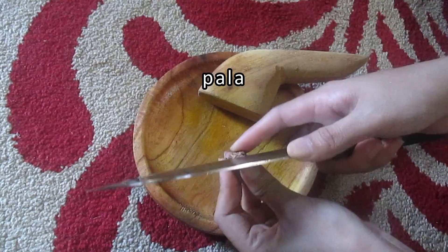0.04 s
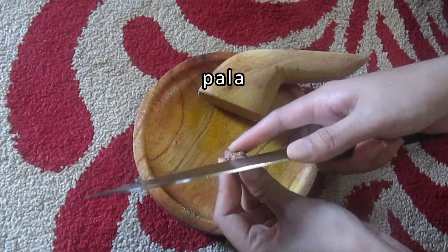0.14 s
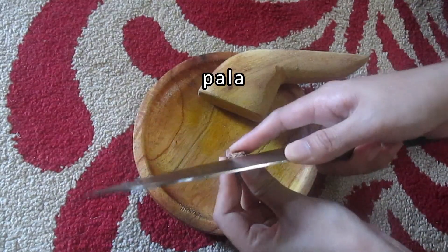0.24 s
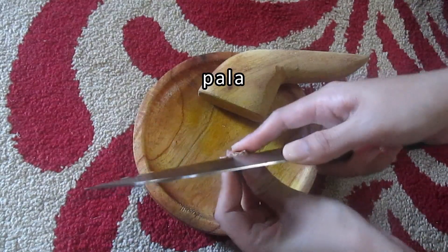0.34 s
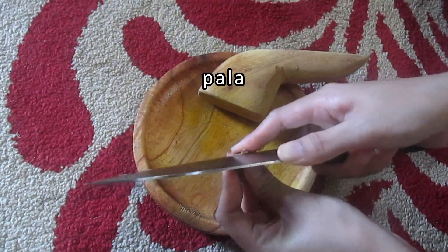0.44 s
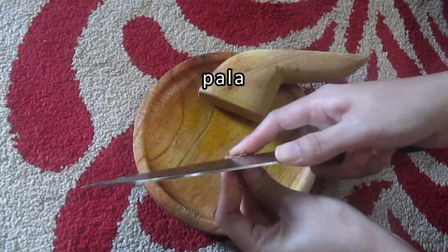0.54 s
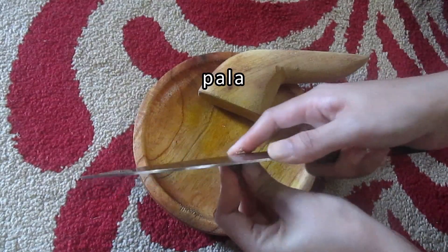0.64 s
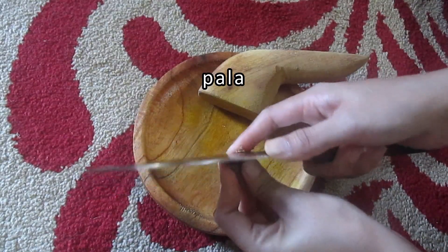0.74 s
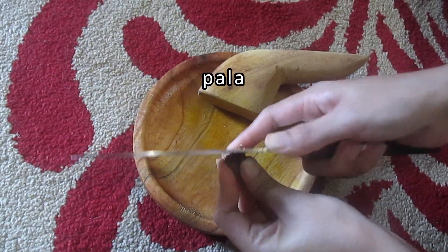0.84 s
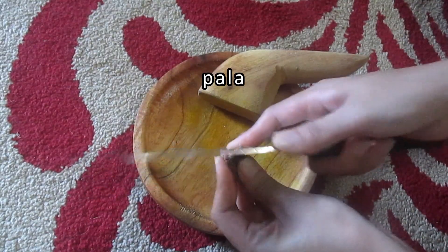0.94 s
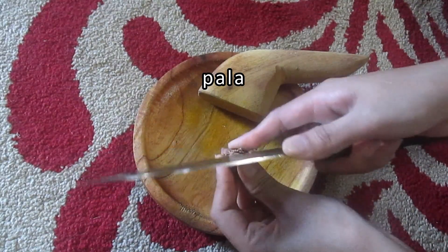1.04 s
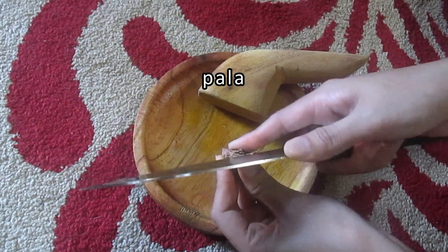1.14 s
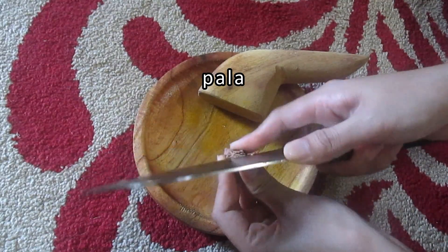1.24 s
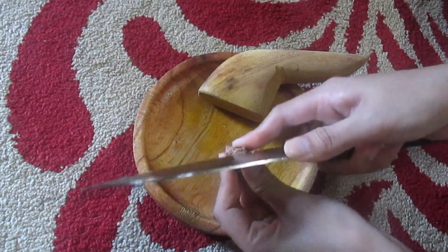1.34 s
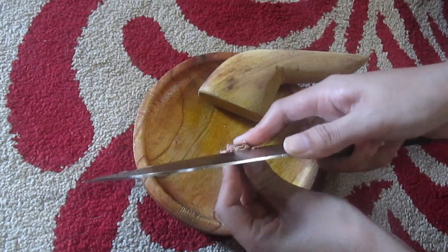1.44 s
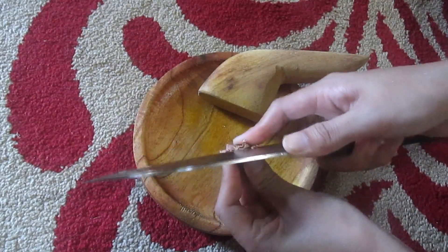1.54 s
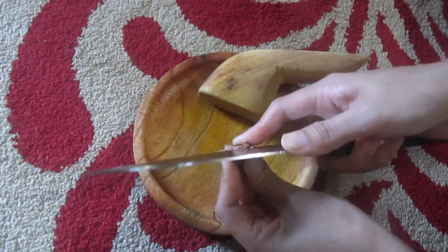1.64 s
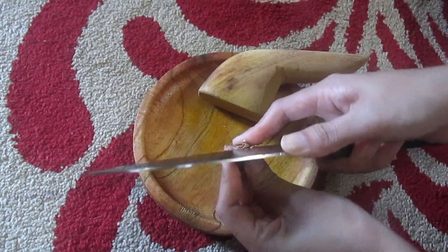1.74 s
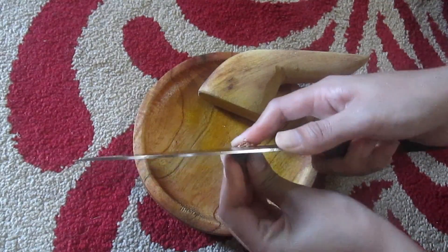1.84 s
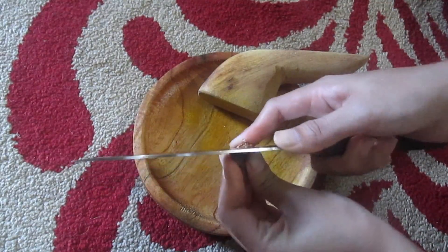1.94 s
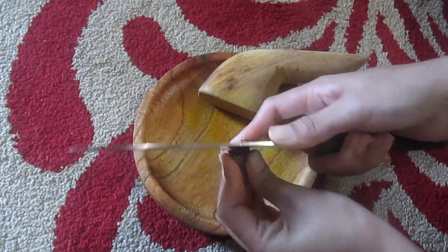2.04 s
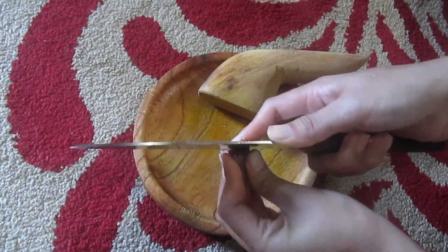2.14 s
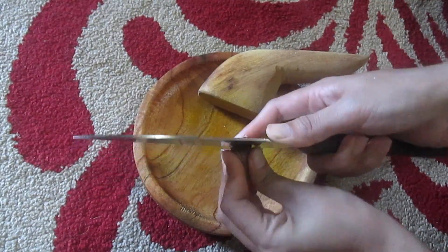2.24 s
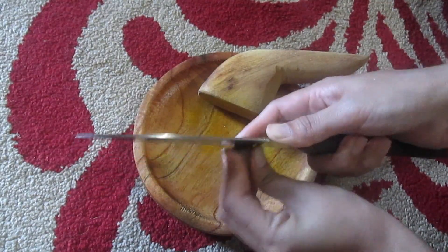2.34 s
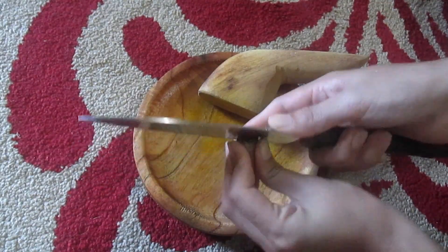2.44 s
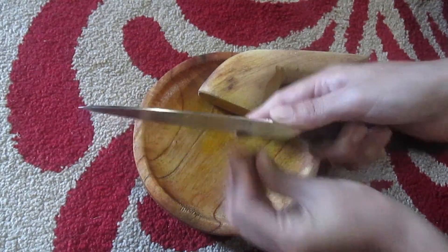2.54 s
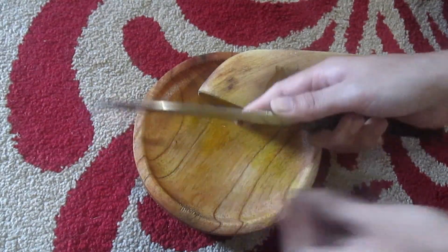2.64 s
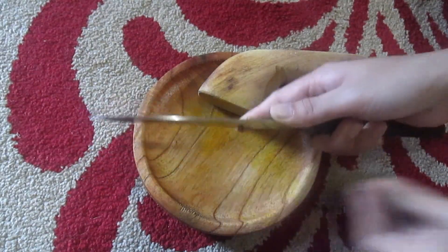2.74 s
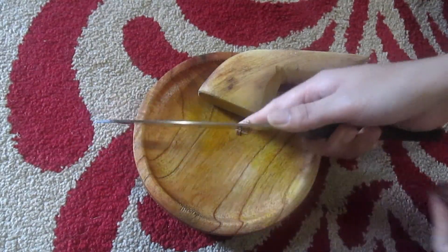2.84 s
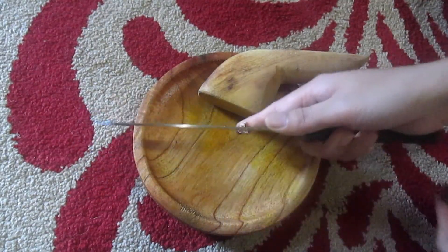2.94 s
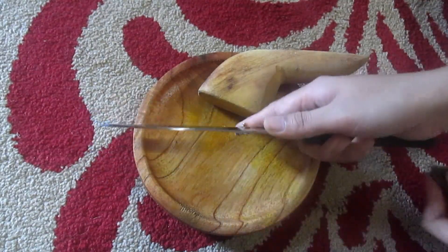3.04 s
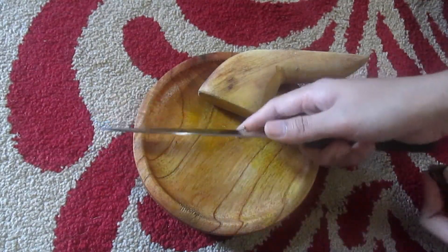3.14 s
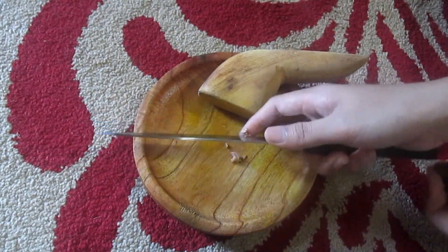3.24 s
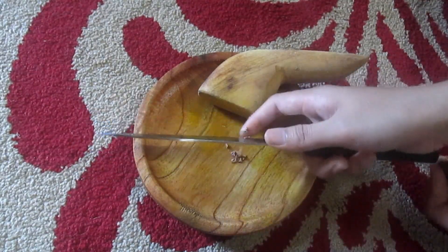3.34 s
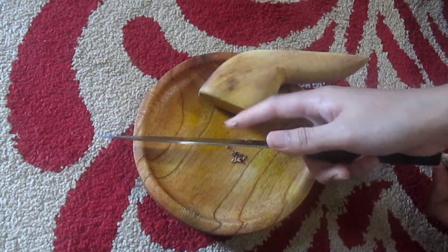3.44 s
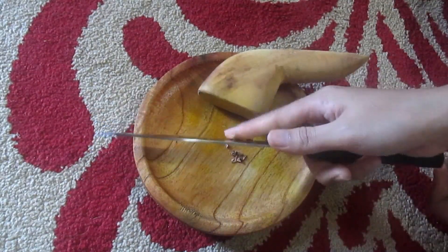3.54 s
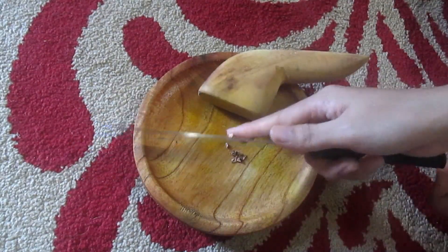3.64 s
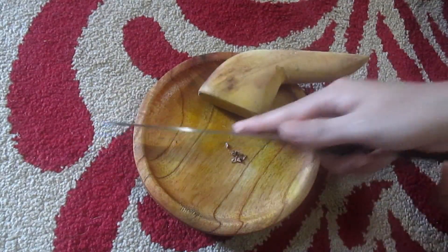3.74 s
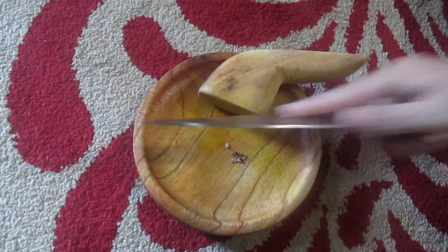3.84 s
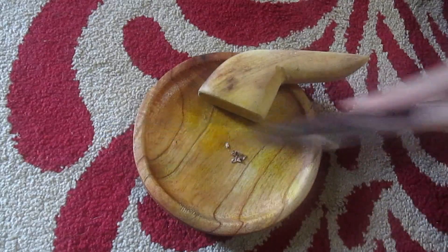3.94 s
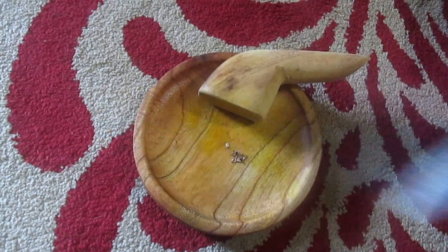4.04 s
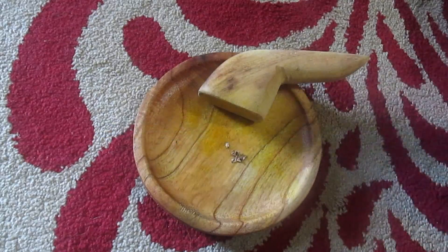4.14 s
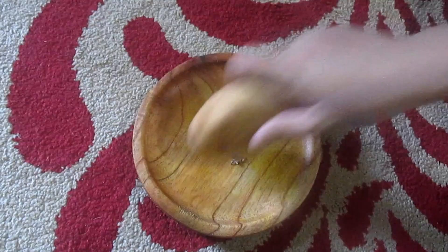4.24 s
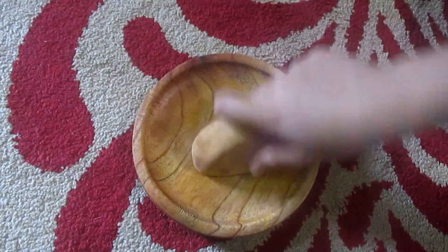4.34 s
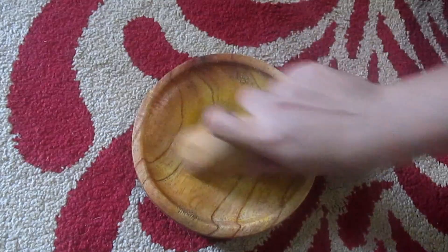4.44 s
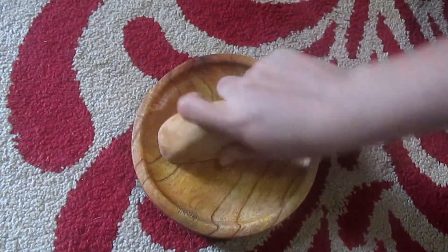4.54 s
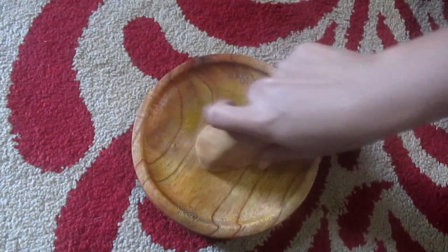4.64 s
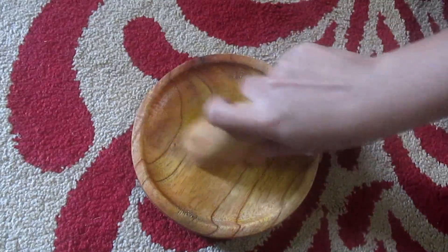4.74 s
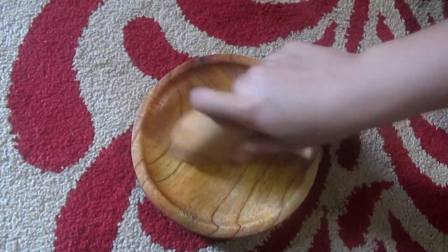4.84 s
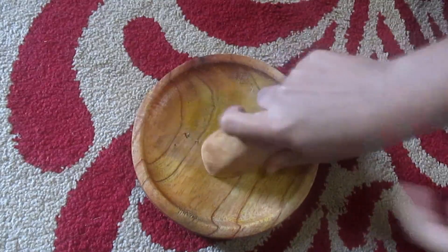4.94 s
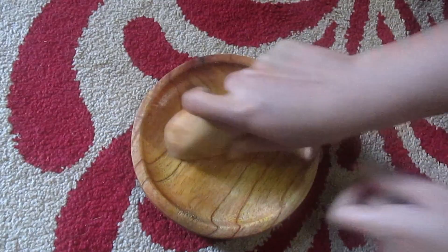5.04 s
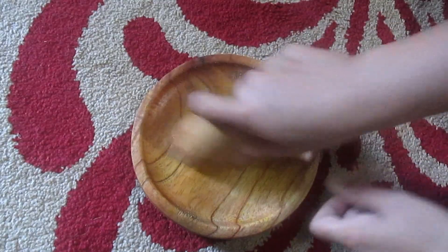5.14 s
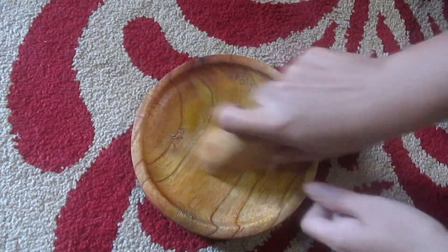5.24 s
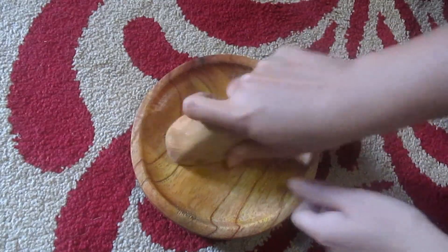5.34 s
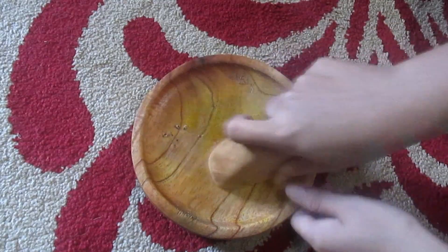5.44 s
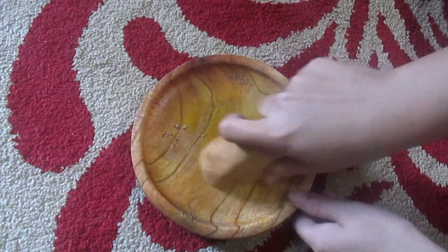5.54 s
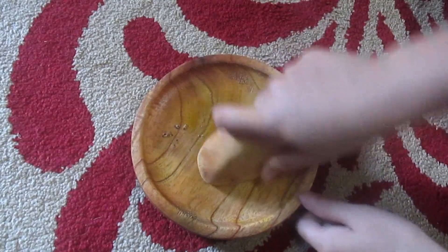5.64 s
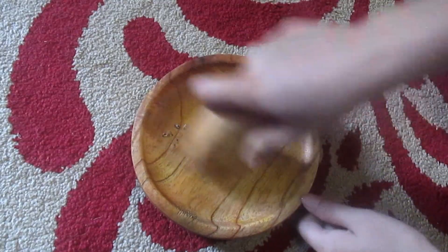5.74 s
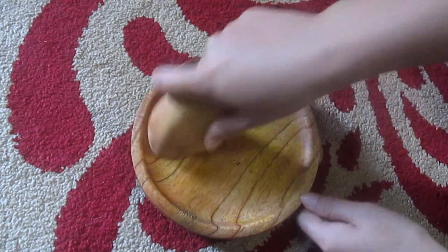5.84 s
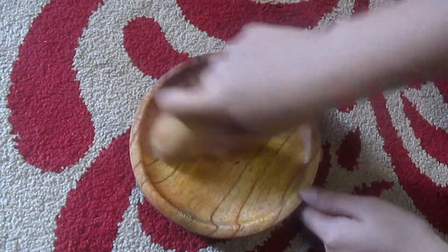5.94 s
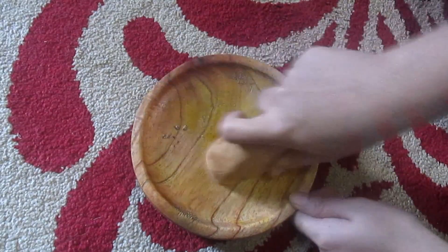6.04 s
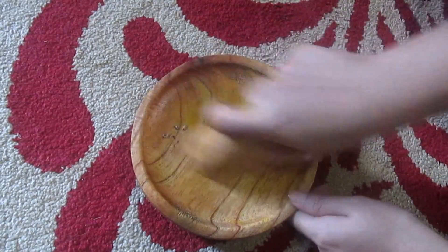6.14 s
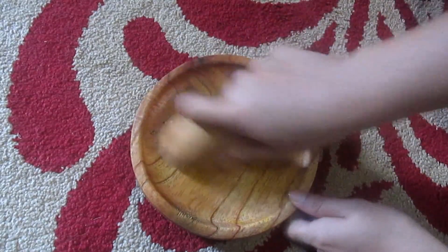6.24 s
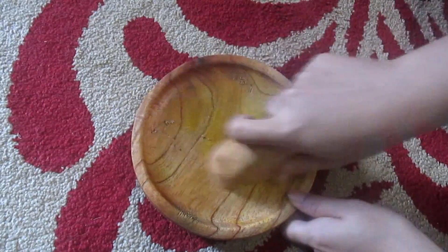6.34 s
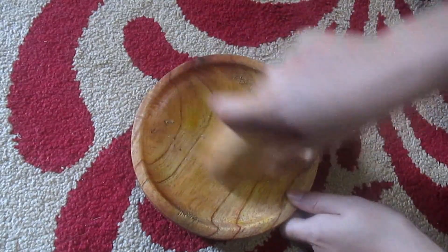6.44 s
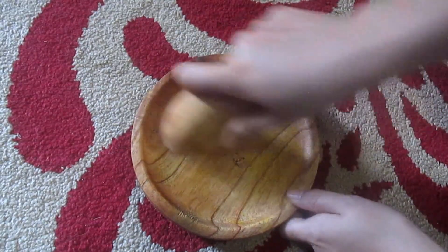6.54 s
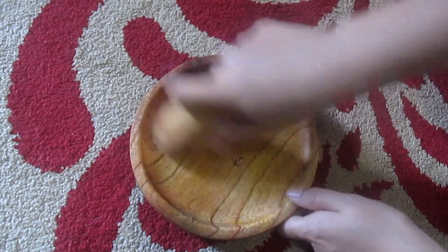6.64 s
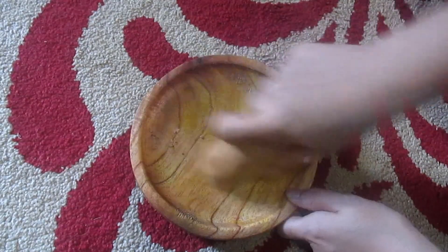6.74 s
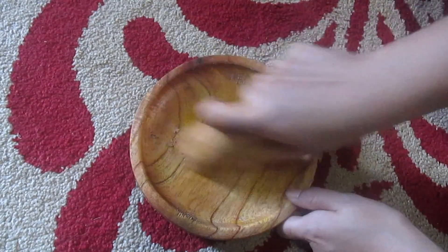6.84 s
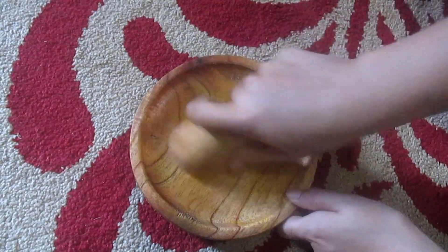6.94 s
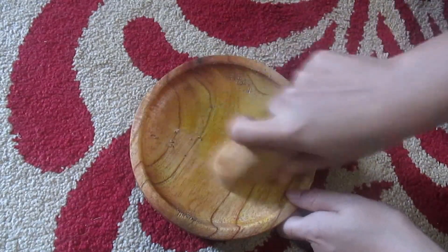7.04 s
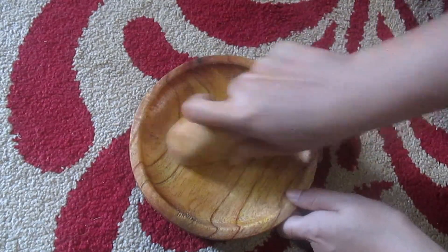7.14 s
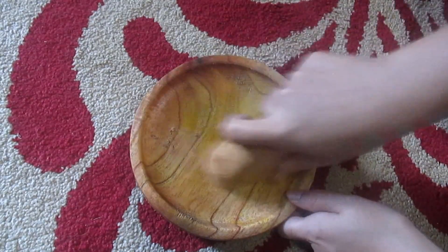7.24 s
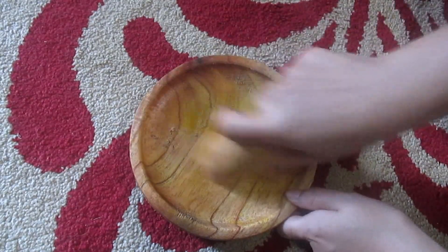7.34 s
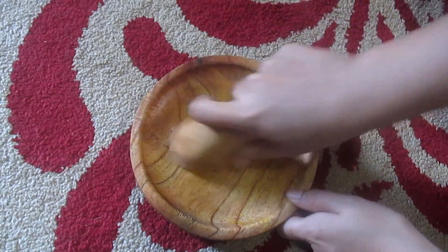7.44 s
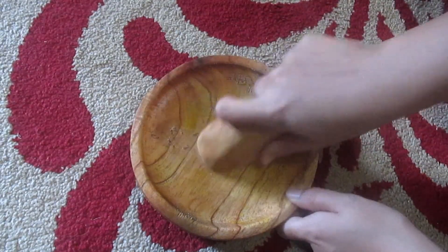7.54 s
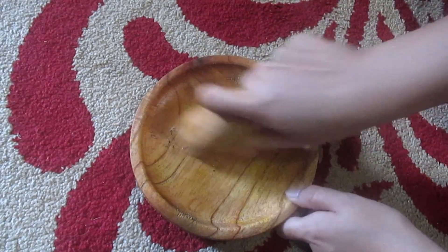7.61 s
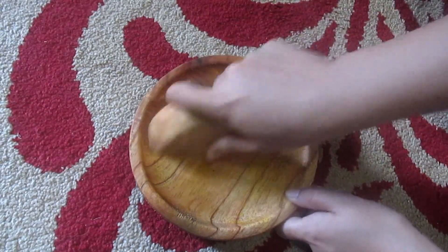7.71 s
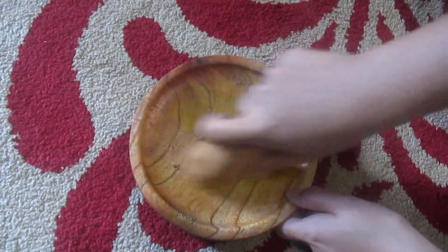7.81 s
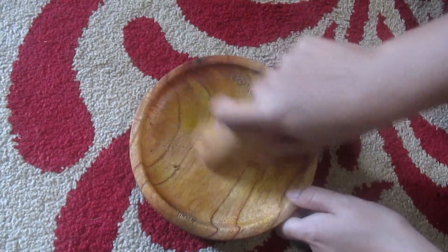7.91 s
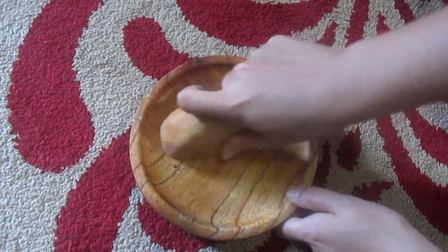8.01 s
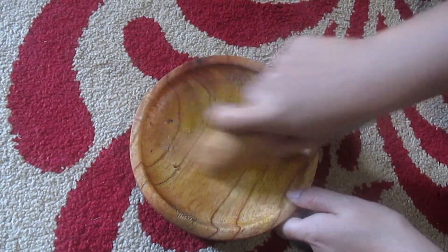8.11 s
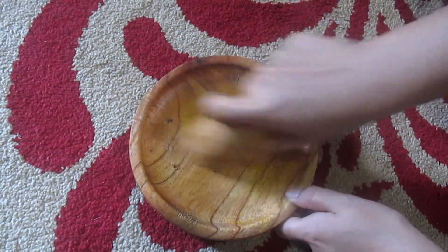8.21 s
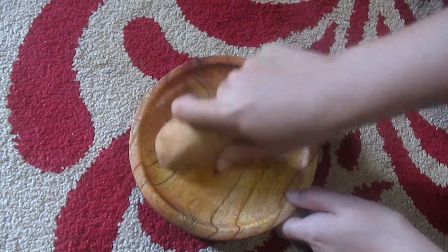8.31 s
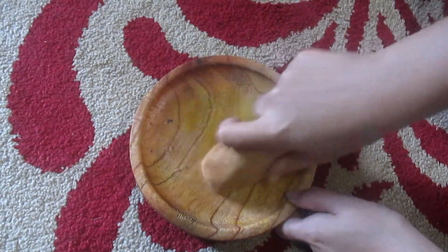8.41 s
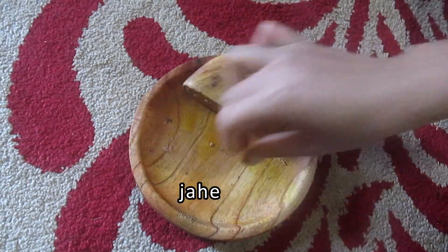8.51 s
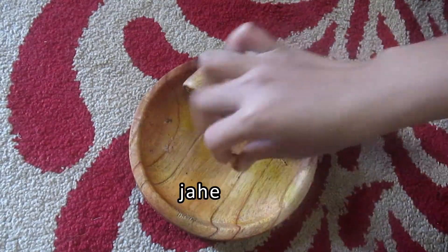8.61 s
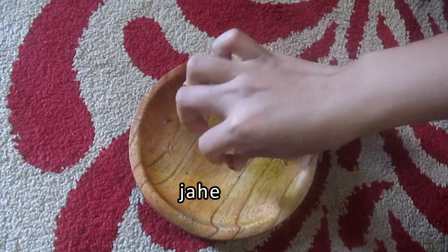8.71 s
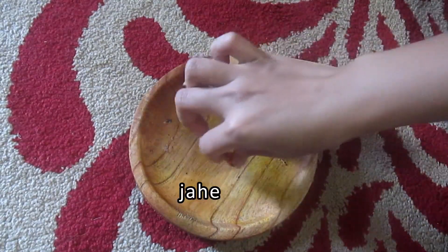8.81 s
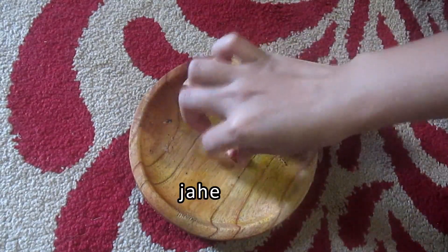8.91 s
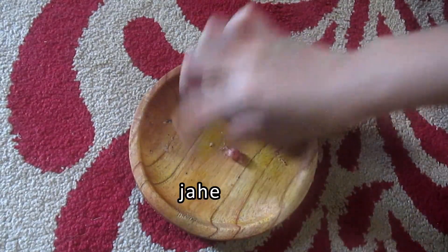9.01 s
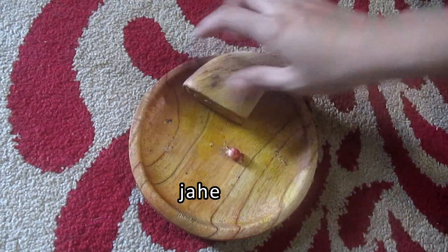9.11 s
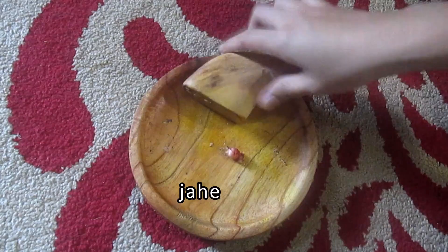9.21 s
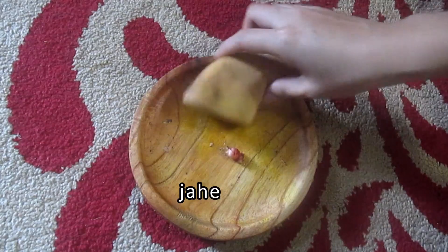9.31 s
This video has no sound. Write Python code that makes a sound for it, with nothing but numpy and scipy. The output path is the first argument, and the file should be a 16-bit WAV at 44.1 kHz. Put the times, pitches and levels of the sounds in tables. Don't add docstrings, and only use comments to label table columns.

```python
import sys
import numpy as np
from scipy import signal
from scipy.io import wavfile
from scipy.ndimage import uniform_filter1d

SR = 44100
rng = np.random.default_rng(int(sys.argv[2]) if len(sys.argv) > 2 else 0)


def store_wav(level_fs):
    pcm = np.round(np.clip(np.atleast_2d(level_fs), -1, 1) * 32767)
    wavfile.write(sys.argv[1], SR, pcm.T.astype(np.int16))


def to_linear_factor(level_db):
    exponent = np.asarray(level_db, float) / 20
    return 10 ** exponent


N = 413327

# t/s, peak level/dB, bowl f/Hz, pestle f/Hz, hardness of the landing/dB
KNOCKS = [
    (4.304, -3, 742, 1360, 2),
    (5.123, -9.5, 725, 1030, -16),
    (5.847, -3, 665, 1354, -8),
    (6.564, -2, 665, 1378, -5),
    (7.763, -8, 747, 1225, -2),
]
# t/s, peak level/dB, pestle level re bowl/dB, hardness/dB
TAPS = [
    (4.538, -31.5, 10.5, -21),
    (9.187, -33, -12, -6),
]
# pestle t60/s, bounce delay t/s, bounce level/dB
REBOUNDS = [(0.0051, 0.00469, -6.5), (0.025, 0.003, -10), (0.0082, .0054, -2), (0.0091, 0.00269, -5),
            (0.011, 0.0054, -11), (0.0064, .0045, -20), (.0066, .005, -20)]
# f/Hz, level/dB, t60/s
EDGE_TONES = [(985, -2.5, 0.0087), (2390, -12, 0.016), (2680, -22, 0.016), (3670, -24, 0.013),
              (4570, -24, 0.0063), (5550, -33, 0.014), (7540, -50, .01)]
# f/Hz, width/Hz, level re bowl tone/dB
ROOM_TAIL = [(1664, 540, -18), (2250, 24, -21), (3000, 160, -32.5)]
TAP_BOWL_HZ, TAP_PESTLE_HZ = 720, 1240
PESTLE_DB, PESTLE_DB_PER_OCTAVE = -2, 33.5
THUD_DB, THUD_PER_SOFTNESS = -12.5, 0.37
ROOM_TAIL_DB = -29.5
CRACK_DB, CRACK_FOLLOWS = -7.5, 4.5


def knocks():
    out, t = np.zeros(N), np.arange(round(.3 * SR)) / SR
    hits = []
    for s, db, bowl_hz, pestle_hz, hard_db in KNOCKS:
        pestle_db = PESTLE_DB + PESTLE_DB_PER_OCTAVE * np.log2(pestle_hz / 1300)
        hits.append((s, db, bowl_hz, pestle_hz, pestle_db, hard_db))
    for s, db, pestle_db, hard_db in TAPS:
        hits.append((s, db, TAP_BOWL_HZ, TAP_PESTLE_HZ, pestle_db, hard_db))
    for hit, rebound in zip(hits, REBOUNDS):
        s, db, *nature = hit
        add(out, s + 0.001616, to_linear_factor(db + 5.0) * one_blow(t, *nature, *rebound))
    return out


def one_blow(t, bowl_hz, pestle_hz, pestle_db, hard_db, pestle_t60, rebound_s, rebound_db):
    blow = mode(t, bowl_hz, 0.061) * (1 - np.exp(-t / 0.0026))
    late = t - rebound_s
    bounce = to_linear_factor(rebound_db) * mode(late, pestle_hz, 0.0068) * np.tanh(late / 0.000083)
    blow += to_linear_factor(pestle_db) * (mode(t, pestle_hz, pestle_t60) + bounce)
    blow -= to_linear_factor(pestle_db - 22.0) * mode(t, 1920, 0.032) * (1 - np.exp(-t / 0.00066))

    contact = signal.butter(2, [450, 5000], "band", fs=SR, output="sos")
    top_hz = np.clip(3500 * to_linear_factor(0.17 * hard_db), 1500, 9000)
    dull = signal.butter(2, top_hz, fs=SR, output="sos")
    blow = signal.sosfilt(dull, signal.sosfilt(contact, blow))

    edge = 0
    for hz, level_db, t60 in EDGE_TONES:
        edge = edge + to_linear_factor(level_db + rng.normal(0, 2.0)) * mode(t, hz * rng.normal(1, 0.02), t60)
    edge = edge * to_linear_factor(hard_db)
    crack = peak(rng.standard_normal(len(t)), 3600, 3000) * to_linear_factor(-60 * t / 0.0024)
    edge += to_linear_factor(CRACK_DB + CRACK_FOLLOWS * hard_db - 7.0) * crack
    thud = to_linear_factor(THUD_DB - 4 - THUD_PER_SOFTNESS * hard_db) * mode(t, 400, 0.023)
    blow += (edge + thud) * (1 - np.exp(-t / 0.00041))
    blow *= 1 / (1 + (t / 0.0073) ** 4)

    room_tail = rms_one(body(rng.standard_normal(len(t)), [(bowl_hz, 70, 0)] + ROOM_TAIL))
    return blow + to_linear_factor(ROOM_TAIL_DB - 60 * t / .5) * (1 - np.exp(-t / 0.038)) * room_tail


# t/s, peak level/dB, f/Hz, thud level re peak/dB
LUMPS = [(4.475, -30, 727, 0.5), (4.865, -21, 776, 2.5), (5.192, -39, 780, -18), (5.358, -29, 674, -15),
         (5.404, -29, 794, -23), (5.909, -17.5, 600, -19), (5.952, -24, 720, -2), (6.115, -24, 770, -16),
         (6.254, -18, 737, -20), (6.672, -16.5, 674, -26), (6.705, -17, 700, -27), (6.765, -29, 696, 2.5),
         (6.941, -19, 886, -28), (6.955, -14, 796, -37), (7.172, -31, 610, 2), (7.214, -25, 640, -22),
         (7.31, -28, 627, -20), (7.907, -17.5, 705, -20), (8.06, -23, 816, -13.5), (8.169, -24.5, 720, -21),
         (8.205, -17, 707, -5.5), (8.327, -16.5, 716, -14), (8.478, -21.5, 694, -20),
         (8.498, -32, 750, -25)]
# f/Hz, width/Hz, level/dB
BOWL_WOOD = [(390, 300, -13), (582, 47, -4.5), (670, 92, -4), (796, 134, -2.5), (941, 82, -5)]
# f/Hz, width/Hz, level/dB
SHAFT = [(1091, 102, 0), (1224, 140, -0.5), (1467, 247, -4), (1900, 340, -13)]
# f/Hz, width/Hz, level/dB
GRIT = [(2364, 300, -3), (3020, 520, -2), (3510, 380, -1.5)]
# f/Hz, width/Hz, level/dB
DUST = [(4500, 150, -6.5), (5330, 160, 2.5), (6050, 430, -2.5), (7080, 460, -3), (8840, 1300, -7.5),
        (12000, 1500, -9.5), (14800, 4300, -15)]
SNAP_DB, SNAP_FOLLOWS = -17, 1


def rubbing():
    t = np.arange(N) / SR
    clumps, slips = drift(60), grains(2000, 3.2, N)
    bowl_gain, shaft_gain, grit_gain, dust_gain = stroke_gains(t)
    wood = bowl_gain * rms_one(body(slips, BOWL_WOOD, shift_db=2.2))
    wood = wood - shaft_gain * rms_one(body(slips, SHAFT, shift_db=2.2))
    wood = wood * to_linear_factor(1.84 * clumps - 0.5)
    crush_lumps(wood, t[:2000])

    mid, side = rms_one(body(grains(3000, 3., (2, N)), GRIT, shift_db=2.2))
    grit = mid * to_linear_factor([[-1.6], [1.6]]) + 0.35 * side * [[1], [-1]]
    grit = grit_gain * to_linear_factor(1.6 * clumps) * grit
    mid, side = rms_one(body(grains(9000, 3., (2, N)), DUST, shift_db=2.4))
    dust = 0.73 * mid + 0.53 * side * [[1], [-1]]
    return wood, grit + dust_gain * to_linear_factor(1.0 * clumps) * dust


def crush_lumps(wood, t):
    middle, _, _, bright_db, _ = np.transpose(sum(STROKES + GRIND, []))
    for start, db, hz, thud_db in LUMPS:
        snap_db = SNAP_DB + SNAP_FOLLOWS * np.interp(start, middle, bright_db)
        snap = mode(t, 1550, 0.019) - 0.29 * mode(t, 2660, 0.0095) + 0.27 * mode(t, 4000, 0.0092)
        crunch = mode(t, hz, 0.042) + to_linear_factor(thud_db) * mode(t, 377, 0.021) + to_linear_factor(snap_db) * snap
        add(wood, start, to_linear_factor(db) * crunch * (1 - np.exp(-t / 0.00091)))


# middle t/s, length/s, bowl level/dB, brightness/dB, pestle chatter/dB
STROKES = [
    [(4.358, 0.042, -34.5, -11, -5), (4.452, 0.15, -41.5, 1, -10), (4.61, 0.14, -40, -1.5, -1.5),
     (4.728, 0.15, -46, 6.5, -2), (4.872, .11, -36, 6, -3.5), (5.004, .13, -34, 4, -1),
     (5.15, 0.12, -33, 2, -3.5), (5.271, .12, -33.5, 4, 1), (5.4, 0.15, -34.5, 3, 1),
     (5.51, 0.094, -50.5, 12, 6)],
    [(5.9, .11, -40, -10, 2.5), (5.992, 0.16, -33, -5, -3), (6.14, 0.14, -33, 1, -0.5),
     (6.282, 0.17, -32.5, 5, 2)],
]
# middle t/s, length/s, bowl level/dB, brightness/dB, pestle chatter/dB
GRIND = [
    [(6.615, 0.11, -40, -14, 4), (6.694, 0.16, -34, -2.5, 0.5), (6.833, 0.12, -32.5, 1.5, 1),
     (6.958, 0.14, -32.5, 0.5, 5), (7.083, 0.16, -33.5, 3.5, 4), (7.213, .13, -34, 2, 5.5),
     (7.342, 0.13, -32, 2, 4), (7.476, 0.15, -39, 6, 3), (7.635, 0.27, -40, 3, 0),
     (7.745, 0.11, -42.5, 8, 4)],
    [(7.806, 0.1, -38.5, 0, 1), (7.908, 0.18, -38, 4, 2), (8.068, 0.16, -31, -0.5, -3.5),
     (8.206, 0.16, -35, 3, 5), (8.348, 0.18, -36, 4.5, 3), (8.49, 0.095, -30, 2, 2.5)],
]
# level re bowl/dB, share of the stroke's colour, power of speed, lead/s
LAYERS = [(0.5, 0.097, 2.38, 0.00051), (-5, 0.91, 2.53, 0.0017), (-15.5, 0.95, 1.64, 0.0011),
          (-20.5, 1.4, 1.18, 0.0013)]
LIFT_S = 8.503
DUST_HUSH_DB, DUST_HUSH_S = 7, 0.055


def stroke_gains(t):
    gains = np.zeros((len(LAYERS), N))
    for middle, length, db, bright_db, chatter_db in sum(STROKES + GRIND, []):
        span = t[:round(length * SR)]
        colours = (0, chatter_db, bright_db, bright_db)
        for gain, (level_db, share, power, lead), colour_db in zip(gains, LAYERS, colours):
            stroke = to_linear_factor(db + level_db + share * colour_db) * arch(span, 0, length) ** power
            add(gain, middle - length / 2 - lead, stroke)
    hush_db = 0
    for s, db, *_ in KNOCKS:
        hush_db = hush_db + DUST_HUSH_DB * to_linear_factor(db) * (t > s) / (1 + ((t - s) / DUST_HUSH_S) ** 4)
    gains[-1] *= to_linear_factor(-hush_db)
    return gains * uniform_filter1d((t < LIFT_S) * 1., size=90)


# t/s, peak level/dB, blade f/Hz, length/s, scratch level/dB
TICKS = [(0.398, -38.5, 3420, 0.012, -1), (0.551, -39, 3340, 0.02, -3), (0.699, -38.5, 4560, 0.012, -6),
         (1.3258, -45, 3360, 0.011, 0), (1.523, -35, 4840, 0.0079, -5), (1.753, -30.5, 4800, 0.0064, -6),
         (1.777, -38, 6000, 0.016, -1), (1.8, -50, 5700, 0.012, 6), (1.99, -44, 6030, 0.012, 2),
         (2.163, -42, 7300, 0.013, -6), (2.27, -33, 5700, 0.0022, 16), (2.317, -36, 7750, 0.0097, -4),
         (2.327, -38, 13000, 0.0085, -2), (2.476, -48, 8120, 0.012, 0), (2.654, -41, 8560, 0.028, 4),
         (2.676, -43, 7000, 0.013, -2), (3.177, -49, 7750, 0.012, -6), (3.224, -35, 2940, 0.006, -30),
         (3.928, -37.5, 7200, 0.0098, -2), (5.19, -42, 3330, 0.0078, -13)]
BLADE_RING_DB, RING_DB_PER_OCTAVE = -6.5, -7


def knife():
    out, t = np.zeros((2, N)), np.arange(round(.1 * SR)) / SR
    scratch_modes = [(8100, 1300, 9), (11500, 1100, 13.0), (13000, 2300, 12), (15400, 1200, -5)]
    for s, db, hz, length, scratch_db in TICKS:
        rise = 1 - np.exp(-t / max(0.27 * (length - .008), .0005))
        shape = np.exp(-t / max(length, .001)) * rise
        noise = rng.standard_normal((2, len(t))) * 2.9 + rng.standard_normal(len(t))
        ring_db = BLADE_RING_DB + RING_DB_PER_OCTAVE * np.log2(hz / 5000) + min(scratch_db + 14, 0)
        rasp = narrow(noise, hz, 630) + to_linear_factor(ring_db) * narrow(noise, 5150, 600)
        click_width_hz = np.clip(8000 * to_linear_factor(.5 * scratch_db), 1500, 9000)
        rasp += 2.0 * rms_one(peak(noise, 2200, click_width_hz)) * np.exp(-t / 0.011)
        rasp += to_linear_factor(scratch_db) * rms_one(body(noise, scratch_modes))
        add(out, s, to_linear_factor(db - 15) * shape * rasp * to_linear_factor([[.3], [-.3]]))
    return out


def room(x):
    t = np.arange(round(.3 * SR)) / SR
    tail = rng.standard_normal((2, len(t))) * to_linear_factor(-60 * t / 0.18) * (t > .006)
    tail = signal.lfilter([1], [1, -.8], tail)
    return signal.fftconvolve(x[None], tail / np.sqrt(np.sum(tail ** 2) / 2), axes=1)[:, :N]


# f/Hz, level per Hz/dB
HOUSE = [(15, -41), (25, -15), (46, -1.5), (118, -6.5), (208, -4.5), (238, -11.5), (313, -13), (427, -14.5),
         (560, -17), (984, -17), (1130, -21), (1830, -30), (2600, -34.5), (3380, -72), (5720, -120)]
# f/Hz, level per Hz/dB
HISS = [(1530, -40), (2600, -10), (2910, 4), (3210, -12.5), (4110, -7), (6610, -3), (7340, -3.5),
        (9410, -5), (10900, -14.5), (15700, -14.5)]
# f/Hz, width/Hz, level/dB
HUMS = [(163.5, 32, -53), (409.7, 120, -52.5), (1818, 95, -70.5), (7750, 880, -68),
        (8213, 45, -78.5)]
# start t/s, length/s, f/Hz, level/dB
DRONE = [
    (0.1, 2.55, 118.9, -47.5),
    (2.6, 1.3, 123.7, -61),
    (1.6, 1.9, 99.9, -54),
    (3.0, 3.4, 100.6, -50),
    (3.0, 1.45, 62, -67),
    (5.0, 4.7, 84.5, -52),
    (6.2, 1.93, 100.6, -60),
    (7.0, 0.78, 63.6, -51),
    (8.4, 1.1, 100.3, -49.5),
]
HOUSE_DB, HISS_DB = -42, -60.5
WHINE_HZ, WHINE_DB = 3015, -78
STEADY_SHARE = 0.93
DRONE_WIDTH_HZ, SWELL_POWER = 10.4, 0.35


def house():
    t = np.arange(N) / SR
    air = to_linear_factor(HOUSE_DB - 2.5) * bands(HOUSE, 28.17, 2658) + to_linear_factor(HISS_DB) * bands(HISS, 2690, 16100)
    noise = rng.standard_normal((2, N)) * 0.61 + rng.standard_normal(N)
    for start, length, hz, db in DRONE:
        tone = np.sin(2 * np.pi * hz * t + 2.05 * drift(1.65))
        motor = np.sqrt(2 * STEADY_SHARE) * tone
        motor = motor + np.sqrt(1 - STEADY_SHARE) * narrow(noise, hz, DRONE_WIDTH_HZ)
        air += to_linear_factor(db) * arch(t, start, length) ** SWELL_POWER * motor
    air += to_linear_factor(WHINE_DB) * np.sqrt(2) * np.sin(2 * np.pi * WHINE_HZ * t)
    for hz, width, db in HUMS:
        air += to_linear_factor(db) * narrow(noise, hz, width)
    return air


# f/Hz, left-right likeness (0 to 1)
LIKENESS = [(60, 0.67), (180, 0.63), (550, 0.75), (1650, 0.18), (4970, -0.0), (15000, 0.011)]


def bands(spectrum, low_hz, top_hz):
    out, edges = 0, np.geomspace(low_hz, top_hz, round(3 * np.log2(top_hz / low_hz)))
    white = rng.standard_normal((2, 2, N))
    for k, (low, high) in enumerate(zip(edges, edges[1:])):
        band = signal.butter(2, [low, high], "band", fs=SR, output="sos")
        mid, side = signal.sosfilt(band, white[k % 2])
        hz = np.sqrt(low * high)
        alike = np.clip(at_hz(LIKENESS, hz), 0, 1)
        stereo = np.sqrt(1 + alike) * mid + np.sqrt(1 - alike) * side * [[1], [-1]]
        out = out + to_linear_factor(at_hz(spectrum, hz)) * stereo
    return rms_one(out)


# t/s, dip level/dB
DIPS = [
    (4.294, 12.5),
    (5.836, 2.5),
    (6.546, 4.5),
]


def recorder_dips():
    t, dip_db = np.arange(N) / SR, 0
    for s, db in DIPS:
        age = np.maximum(t - s, 0)
        recovery = 0.57 * np.exp(-age / 0.16) + 0.94 * np.exp(-age / 0.3)
        dip_db = dip_db + db * (1 - np.exp(-age / .002)) * recovery
    return to_linear_factor(-dip_db)


def rms_one(x):
    return x / np.sqrt(np.mean(x ** 2) + 1e-20)


def at_hz(points, hz):
    points_hz, values = np.transpose(points)
    return np.interp(np.log(hz), np.log(points_hz), values)


def drift(rate):
    r = np.exp(-40 * np.pi * rate / SR)
    slow = signal.lfilter([1], [1, -2 * r, r * r], rng.standard_normal(N // 20 + 4002))[4000:]
    return np.interp(np.arange(N) / 20, np.arange(len(slow)), rms_one(slow))


def peak(x, hz, width_hz):
    r = np.exp(-np.pi * width_hz / SR)
    turn = [1, -2 * r * np.cos(2 * np.pi * hz / SR), r * r]
    return signal.lfilter(np.array([1, 0, -1]) * (1 - r * r) / 2, turn, x)


def narrow(noise, hz, width_hz):
    return rms_one(peak(peak(noise, hz, width_hz), hz, width_hz))


def body(x, modes, shift_db=0):
    out = 0
    for k, (hz, width, db) in enumerate(modes):
        if shift_db:
            db = db + shift_db * drift(15.2)
        out = out + (-1) ** k * to_linear_factor(db) * peak(x, hz, width)
    return out


def mode(t, hz, t60):
    return (t > 0) * np.sin(2 * np.pi * hz * t) * to_linear_factor(-60 * np.maximum(t, 0) / t60)


def grains(per_s, spread_db, size):
    sizes = to_linear_factor(spread_db * np.minimum(rng.exponential(1, size), 4)) * rng.choice([-1, 1], size)
    return rms_one(sizes * (rng.random(size) < per_s / SR))


def arch(t, start, length):
    return np.sin(np.pi * np.clip((t - start) / length, 0, 1))


def add(track, s, sound):
    i = round(s * SR)
    track[..., i:i + sound.shape[-1]] += sound[..., :N - i]


def scene():
    wood, powder = rubbing()
    blows = knocks()
    direct = wood + blows
    bowl = direct * to_linear_factor([[-.7], [.7]])
    bowl = bowl + to_linear_factor(-13.0) * peak(direct, 1950, 1700) * [[-1], [1]]
    bowl = bowl + room(to_linear_factor(-21.5) * wood + to_linear_factor(-25.0) * blows)
    return bowl + powder + knife() + recorder_dips() * house()


def top_cut(x):
    return signal.sosfilt(signal.butter(12, 16730, fs=SR, output="sos"), x)


def record(dry):
    notch_hz, notch_width_hz, top_hz = 7900, 110, 15740
    b, a = signal.iirnotch(notch_hz, notch_hz / notch_width_hz, fs=SR)
    band_limit = signal.ellip(8, .5, 60, top_hz, fs=SR, output="sos")
    mix = signal.sosfilt(band_limit, signal.lfilter(b, a, dry))
    mix = np.clip(mix, -1, 1)
    return top_cut(mix)


dry = scene()
out = record(dry)
store_wav(out)
```